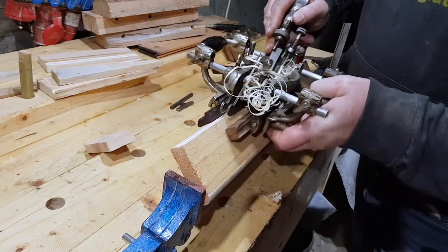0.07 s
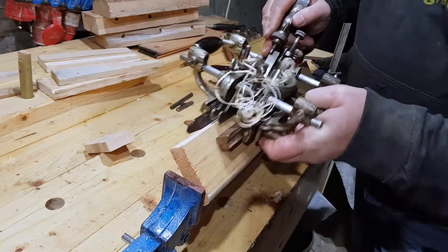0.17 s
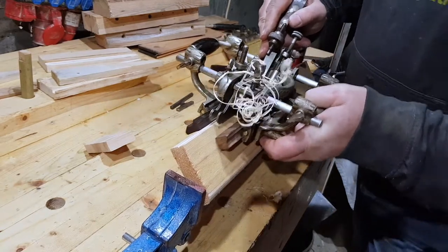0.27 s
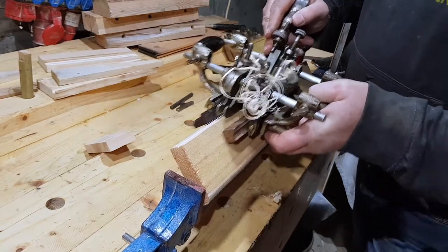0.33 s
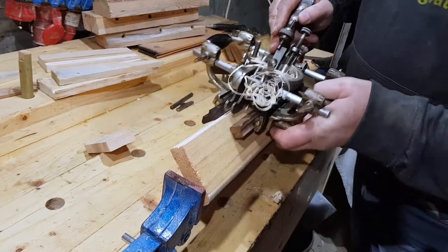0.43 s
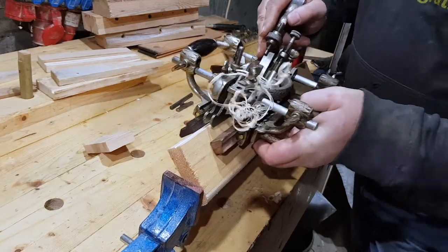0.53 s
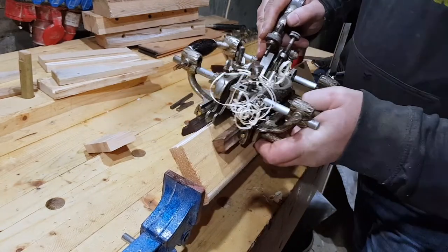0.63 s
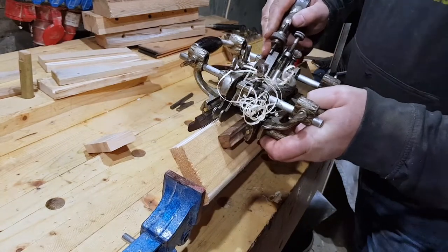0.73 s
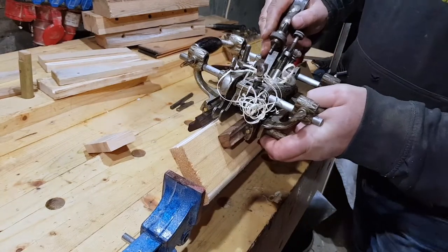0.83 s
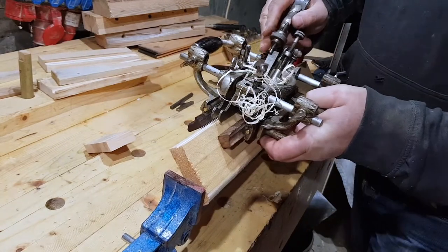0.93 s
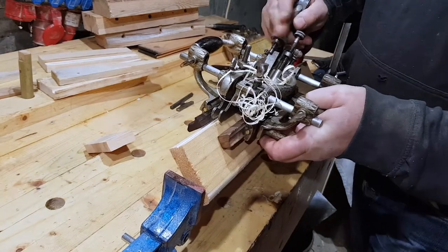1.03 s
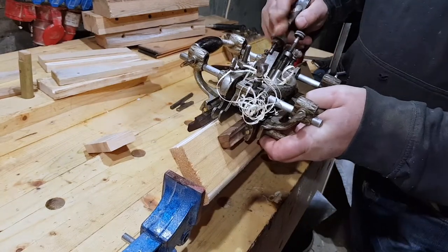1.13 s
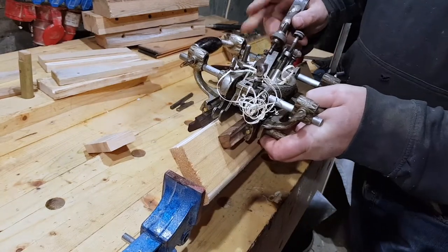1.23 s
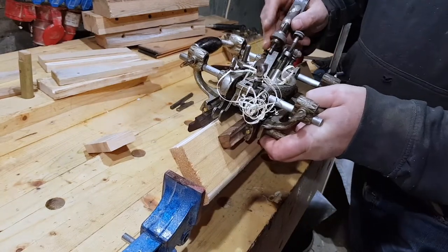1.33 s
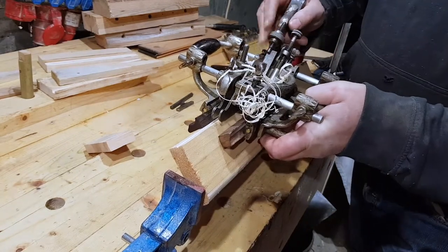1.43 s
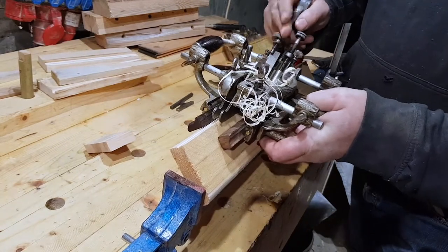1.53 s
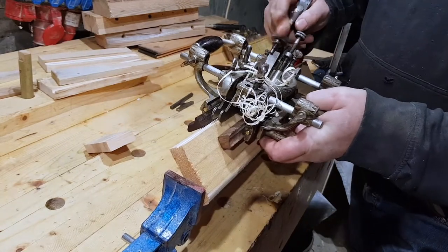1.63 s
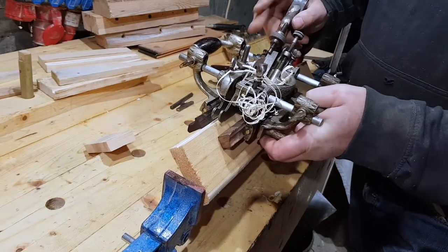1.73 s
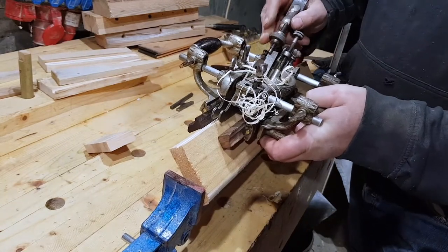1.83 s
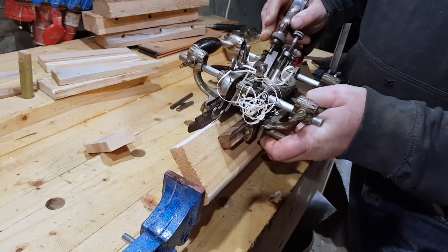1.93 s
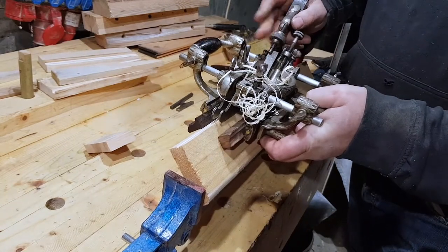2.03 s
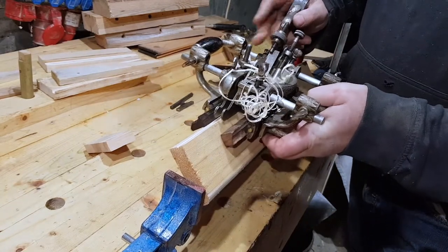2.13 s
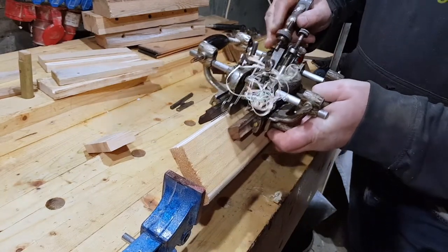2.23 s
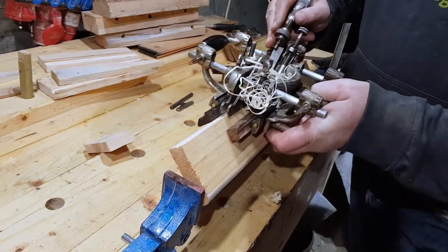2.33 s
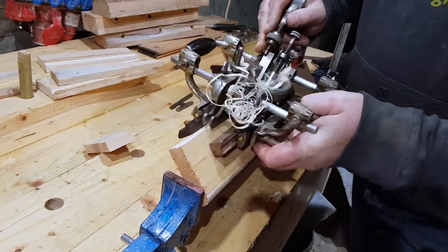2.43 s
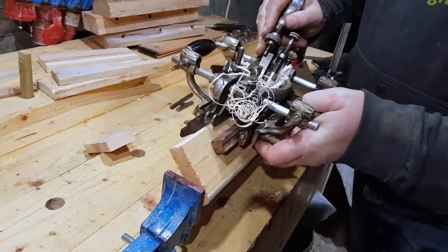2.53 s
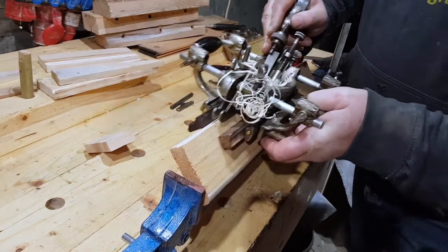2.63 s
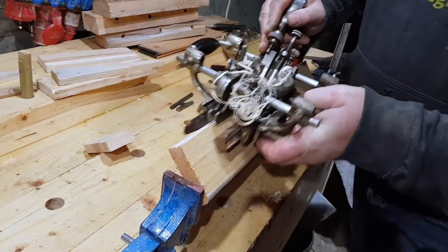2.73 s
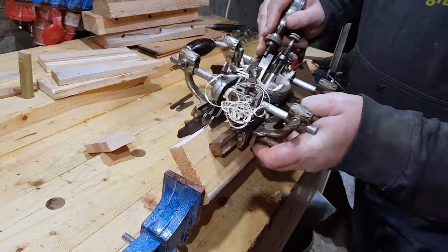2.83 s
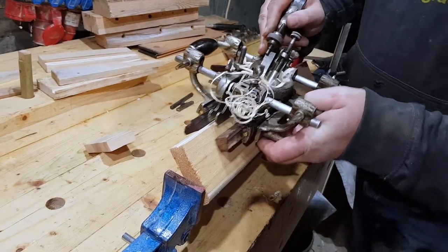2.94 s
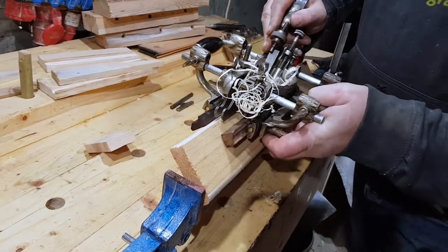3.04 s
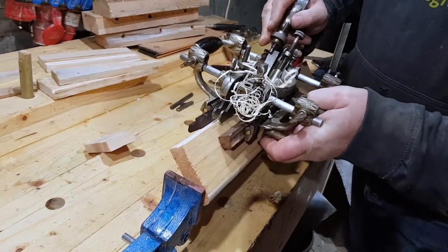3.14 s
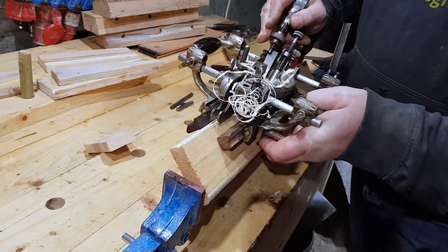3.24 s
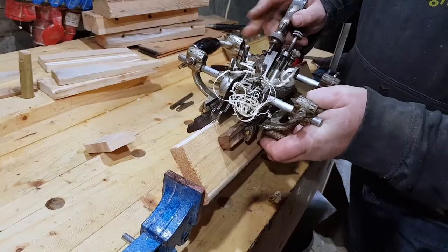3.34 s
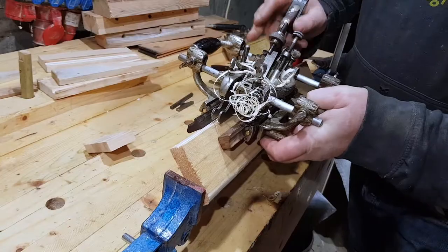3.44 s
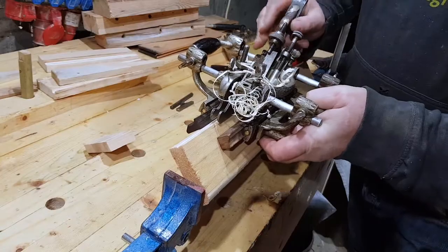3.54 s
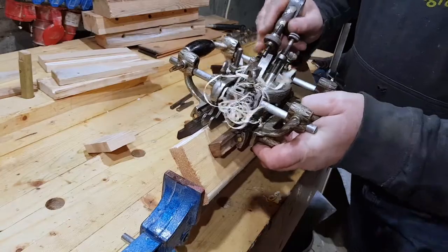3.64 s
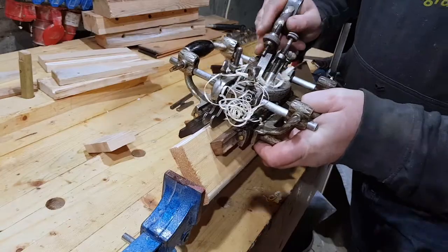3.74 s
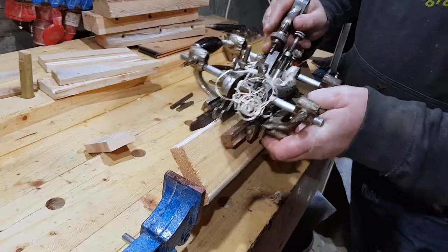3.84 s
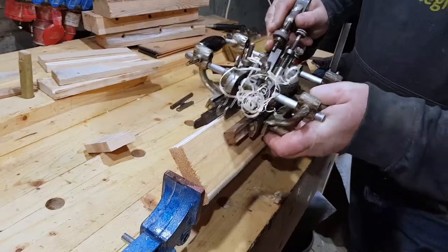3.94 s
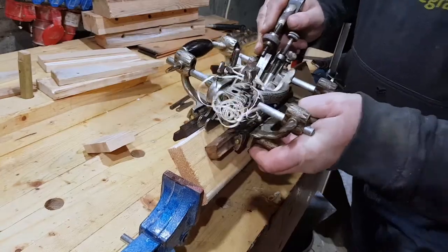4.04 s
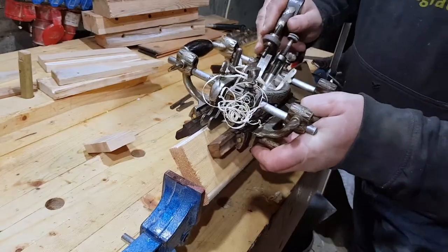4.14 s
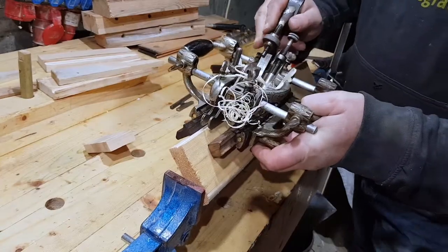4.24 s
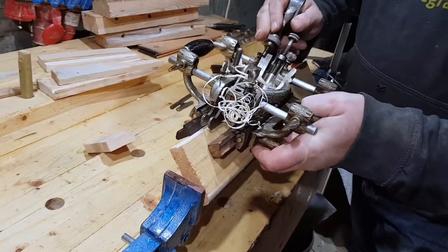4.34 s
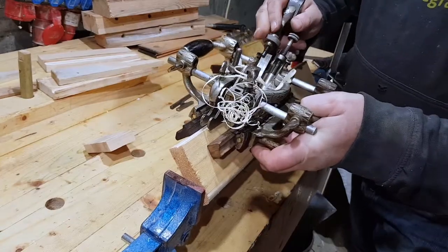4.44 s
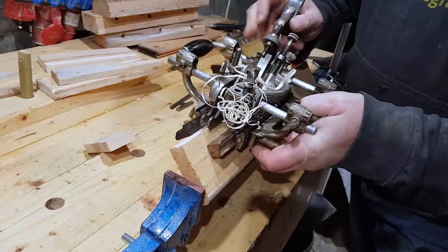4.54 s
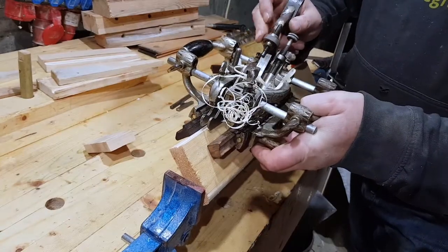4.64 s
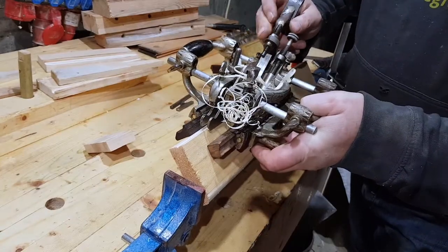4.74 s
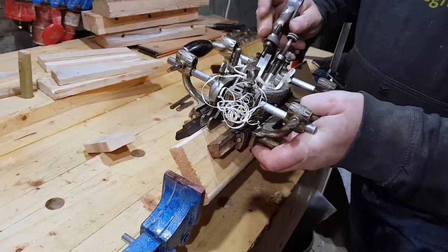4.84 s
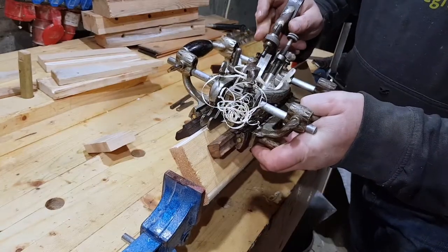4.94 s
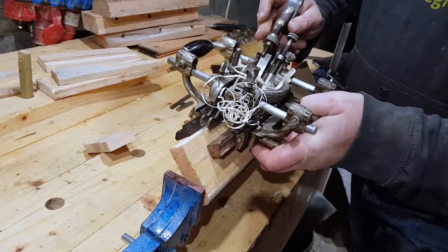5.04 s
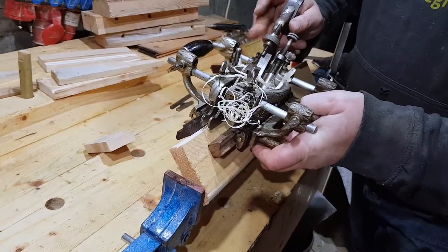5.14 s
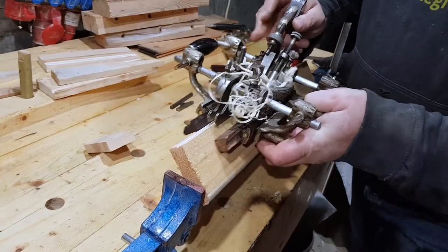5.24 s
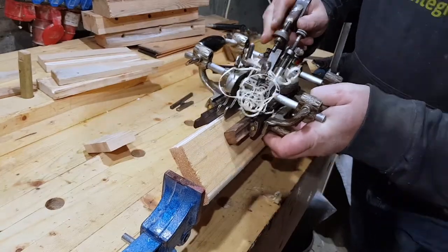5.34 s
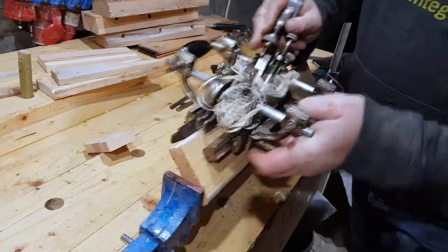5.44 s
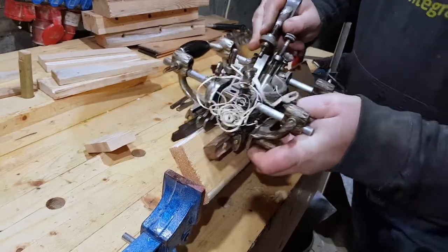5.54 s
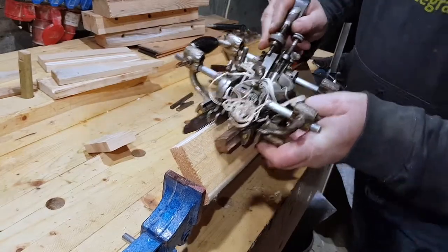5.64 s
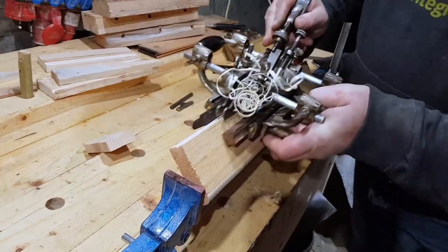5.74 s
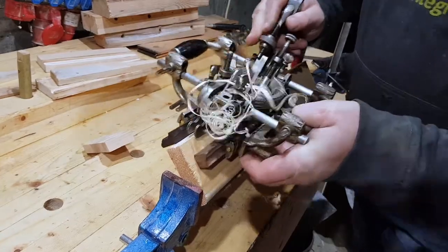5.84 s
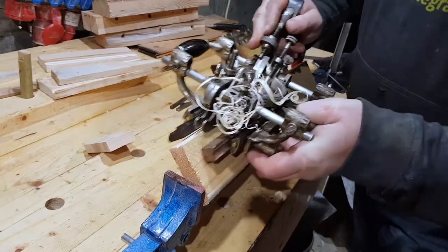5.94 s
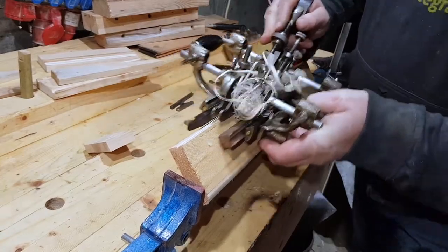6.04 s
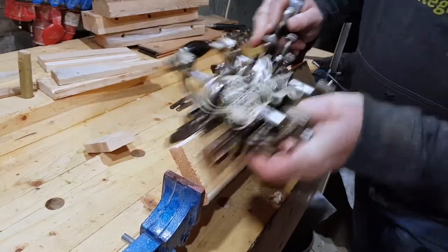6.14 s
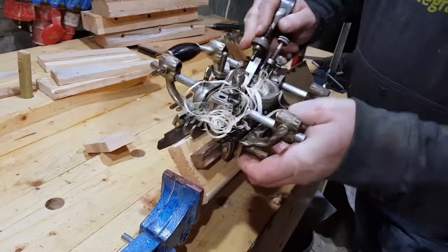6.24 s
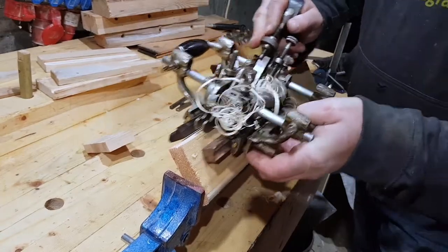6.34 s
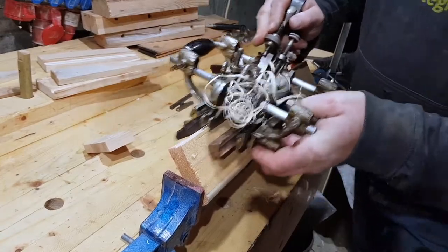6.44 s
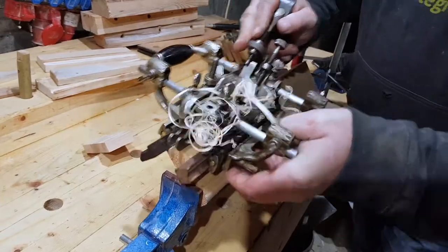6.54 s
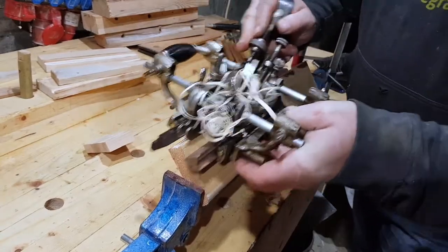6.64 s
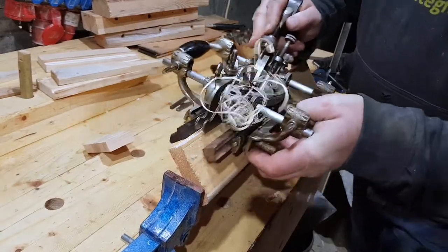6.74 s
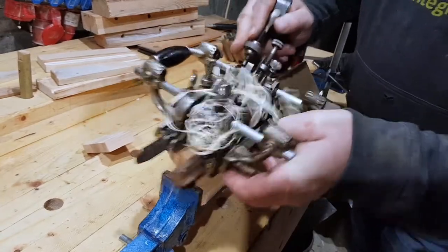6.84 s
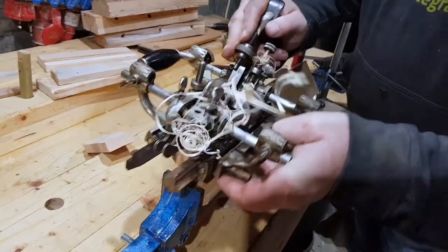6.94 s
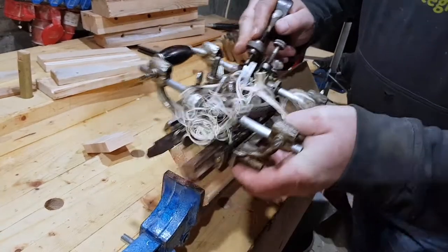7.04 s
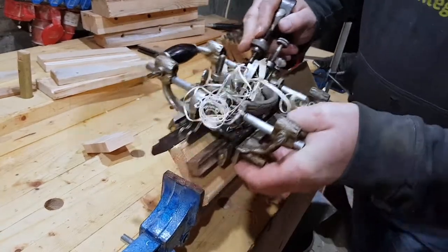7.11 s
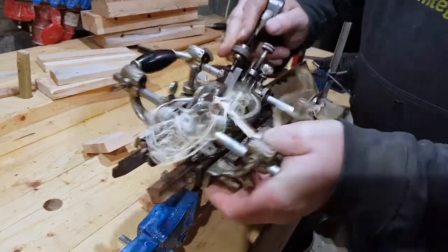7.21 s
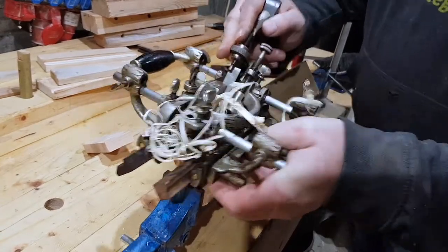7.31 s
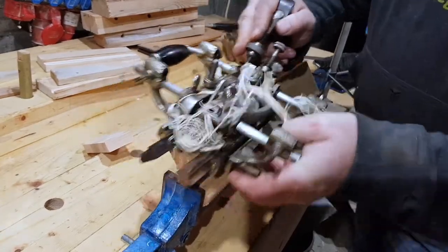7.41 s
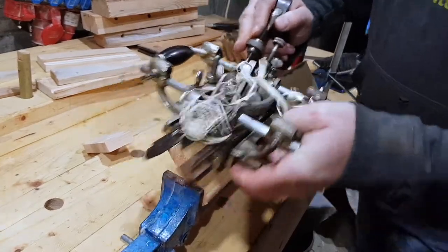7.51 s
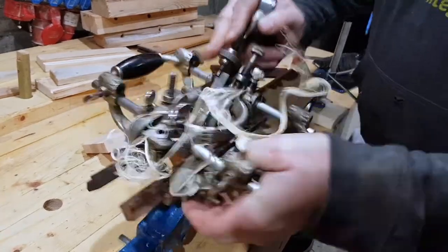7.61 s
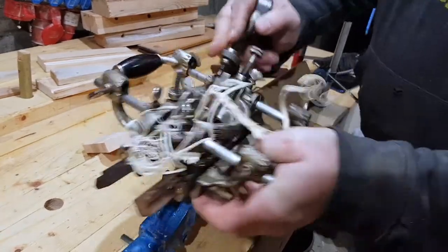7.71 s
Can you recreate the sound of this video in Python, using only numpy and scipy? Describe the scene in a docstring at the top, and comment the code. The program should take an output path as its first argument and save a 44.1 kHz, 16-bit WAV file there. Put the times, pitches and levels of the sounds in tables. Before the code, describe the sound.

Close-up short scrapes and woody knocks of a steel plane on a board, pausing at times, then coming quick and steady over low bench thumps.

```python
"""A quiet workshop, microphone close to a board in a bench vice: a metal plane is pushed in short quick strokes.
Knocks and cuts open it; about 1 to 2.2 s mostly faint gentle strokes pass, then a flurry comes near 2.5 s
and more strokes near 4 s. After a lull before 5.3 s the strokes come thick to the end: filtered noise for torn
fibres and rubbed wood, struck modes for board, booming bench and faint steel, noise bursts for snapping shavings.
Behind all lie a faint room echo, still air and microphone hiss; automatic gain yields to loud sound."""
import sys
import numpy as np
from scipy import signal
from scipy.fft import rfft, irfft, next_fast_len
from scipy.io import wavfile
from scipy.ndimage import uniform_filter1d, map_coordinates

SR = 44100
rng = np.random.default_rng(int(sys.argv[2]) if len(sys.argv) > 2 else 0)


def store_wav(level_fs):
    """Save 16-bit WAV to argv[1]."""
    pcm = np.round(np.clip(np.atleast_2d(level_fs), -1, 1) * 32767)
    wavfile.write(sys.argv[1], SR, pcm.T.astype(np.int16))


N = 342657

# The iron bites: (time of peak [s], force [dB], fall by 20 dB [s], fizz over force [dB], rub over force [dB])
CUTS = [(0.145, -59.5, 0.13, -32, 27), (0.185, -59, 0.048, -2, 14), (0.509, -44.5, 0.074, -27, 16.5),
        (0.546, -60, 0.044, 5.5, 9.5), (2.396, -49.5, 0.092, -12, 11.5), (2.77, -50, 0.086, -15, 16.5),
        (3.996, -45, 0.082, -16.5, 18), (5.434, -48.5, 0.077, -10, -8), (5.812, -47, 0.082, -11.5, 8.5),
        (6.174, -48, 0.02, -11, 19.5), (6.225, -58, 0.25, -15, 15.5), (6.511, -55.5, 0.09, -6, 23.5),
        (6.833, -47.5, 0.079, -18, 19.5), (7.182, -52, 0.12, -8.5, 19.5), (7.583, -48.5, 0.051, -11, 18.5)]
# Gentler, round-topped strokes that tear fewer fibres:
# (time of peak [s], force [dB], rise by 20 dB [s], fall by 20 dB [s])
GENTLE_STROKES = [(0.037, -64.5, 0.088, 0.089), (0.378, -55.5, 0.066, 0.073), (0.764, -79.5, 0.29, 0.041),
                  (1.517, -73.5, 0.093, 0.086), (2.148, -77, 0.036, 0.074), (2.229, -61, 0.087, 0.11),
                  (2.66, -69.5, 0.1, 0.04), (2.991, -64.5, 0.13, 0.077), (3.173, -67, 0.084, 0.044),
                  (3.621, -56.5, 0.046, 0.065), (3.895, -61.5, 0.14, 0.03), (5.31, -61, 0.13, 0.2),
                  (5.678, -58.5, 0.062, 0.049), (6.042, -63, 0.13, 0.052), (6.131, -62, 0.034, 0.016),
                  (6.7, -70.5, 0.079, 0.062), (7.058, -66, 0.12, 0.029), (7.41, -67, 0.066, 0.12),
                  (7.768, -72, 0.1, 0.047)]
# The tool slips suddenly: (time of peak [s], force [dB])
NUDGES = [(1.011, -78.5), (3.251, -70), (3.33, -70), (3.575, -81), (3.68, -59.5), (4.206, -73),
          (4.469, -72.5), (5.553, -59.5)]
# Tearing fibres: (frequency [Hz], relative level per Hz [dB])
RASP = [(710, -7), (1200, -15), (2710, -18), (3870, -14.5), (6950, -20.5), (10000, -28.5), (13000, -30.5),
        (22000, -120)]
# Bright edge of the tearing: (frequency [Hz], relative level per Hz [dB])
FIZZ = [(6000, -64), (8000, -4.5), (10500, -8.5), (14000, -10.5), (15600, -9), (15900, -35), (17000, -46)]
# Iron and rods of the plane: (frequency [Hz], width [Hz], relative level [dB])
STEEL = [(3890, 50, 0), (11800, 22, -2)]
# The plane's casting: (frequency [Hz], width [Hz], relative level [dB])
CASTING = [(1524, 45, 5), (1688, 45, 3), (1809, 20, 1), (2400, 180, 1.5), (3028, 32, -5.5)]
# Board modes, before a knock shifts or damps them: (frequency [Hz], width [Hz], relative level [dB])
BOARD = [(145, 32, -5), (205.3, 29, -4), (309, 53, -3), (390.8, 11.4, 5.5), (469, 67, -3), (592.3, 36, 1),
         (637, 79, -5), (826, 63, -3), (1032, 76, -7), (1201, 37, -5.5), (1507, 100, -10.5),
         (1735, 49, -11.5), (2210, 480, -17.5), (3060, 120, -24), (4400, 1900, -34)]
# Tool on board: (time [s], level [dB], hardness [dB], weight [dB], clack [dB])
KNOCKS = [(0.107, -36, -13, -10, 1), (0.164, -28, -20, -10.5, -6), (0.216, -40.5, -23, -1.5, 4),
          (0.456, -35.5, -34, -10.5, 5.5), (0.502, -35.5, -12, -7, 15), (0.530, -28.5, -2, -7.5, 8),
          (0.608, -38.5, -10, -17, 4.5), (0.712, -48.5, -30, -18, -17), (0.802, -57, -27, -12, 2.5),
          (1.017, -51.5, -15, -35, -6), (1.321, -50.5, -29, -20, -7), (1.446, -47, -10, -15, 0.5),
          (1.7, -55.5, -31, -9.5, -5), (1.874, -48.5, -5.5, -19, 10), (2.3, -46, -8.5, -8, 4),
          (2.33, -43, -8, -3, 7), (2.352, -37.5, -4.5, -18, -18), (2.378, -30, -8, -17, -2),
          (2.418, -28, -10.5, -13, 0), (2.466, -31, -15.5, -9.5, -4), (2.485, -42, -8, -6, 12),
          (2.593, -32.5, -24, -18.5, -1), (2.743, -37.5, -12, -12.5, 8.5), (2.777, -41.5, -15, 0, -3),
          (3.571, -54, -1.5, -7.5, 11), (3.647, -38, -5.5, -11, 7), (3.929, -42, -21, -12.5, 0),
          (4.015, -30, -4, -9, 2), (4.189, -40.5, -31, -14.5, -1.5), (4.29, -53.5, -29, -7.5, -19),
          (4.335, -46.5, -24, -25.5, -11), (4.467, -56, -8, -21, -1), (4.489, -50.5, -12, -16, -10),
          (4.621, -45, -17.5, -12.5, -5.5), (5.364, -46, -22, -4, 4), (5.446, -29, -4, -9, 5.5),
          (5.522, -30.5, -16.5, -18.5, 2), (5.633, -30, -21, -14.5, 3.5), (5.736, -38, -14, -13, -2),
          (5.813, -25.5, -10, -13, 5), (5.888, -31, -20, -14, -0.5), (6.007, -35, -15, -13.5, 4),
          (6.167, -29.5, -2.5, -14.5, 4.5), (6.212, -24, -9, -9, 0), (6.226, -35.5, -16, -25, 13),
          (6.36, -35.5, -15, -16, 6), (6.497, -31, -1.5, -10, 7.5), (6.597, -43, -2, -11.5, 3.5),
          (6.696, -37, -16, -12, 5.5), (6.897, -37.5, -9, -4, 4), (7.177, -37.5, 2.5, -5, 10),
          (7.21, -42.5, -4, 3.5, -3), (7.572, -40.5, 6.5, -5, -8), (7.736, -43, -15, -8, 3.5)]
# Shavings snap: (time [s], level [dB], top over level [dB])
TICKS = [(0.76, -48, -20), (2.1796, -33, -43), (2.4195, -32.5, -2.5), (2.5441, -35.5, -7),
         (2.782, -33.5, -3), (3.251, -44, -15), (3.33, -47.5, -10), (3.572, -47, -28), (3.6747, -30.5, -20),
         (3.833, -45.5, -5), (4.0164, -33, -12.5), (4.0521, -27, -20), (4.204, -44.5, -12),
         (4.4666, -57, -3), (5.8137, -38, 0), (6.4981, -23, -13.5), (6.5251, -35, 1.5),
         (6.8443, -16.5, -45), (6.8693, -56, 7), (6.8778, -36.5, 4), (7.044, -41, -13),
         (7.203, -26.5, -10.5), (7.4016, -23.5, -14), (7.5807, -22, -12)]
# Lower and upper colour of a snap: (frequency [Hz], relative level per Hz [dB])
TICK_LOW = [(800, -0.5), (3500, -3.5), (8000, 5), (11000, -3.5)]
TICK_TOP = [(7000, -3.5), (10500, 10.0), (15500, 7.0), (17000, -23.5)]
# A thin steel ring as a stroke ends: (time [s], level [dB])
PINGS = [(0.5526, -51), (2.4513, -58), (3.677, -55), (4.0502, -50), (5.4767, -50), (5.8594, -63),
         (6.2108, -61), (7.6221, -66)]
# The hands shove the bench: (time of peak [s], force [dB], fall by 20 dB [s])
SHOVES = [(0.122, -47.5, 1), (0.234, -42.5, 0.27), (0.493, -42.5, 0.39), (1.105, -63.5, 0.65),
          (1.506, -53, 0.21), (1.717, -63.5, 0.34), (2.169, -61.5, 0.69), (2.262, -49.5, 0.97),
          (2.421, -43, 0.256), (2.793, -43.5, 0.41), (3.151, -60.5, 0.22), (3.667, -35, 0.13),
          (3.796, -52, 0.95), (4.028, -38, 0.15), (4.217, -56.5, 0.21), (4.641, -71.5, 0.1),
          (5.158, -71, 0.69), (5.312, -58.5, 0.076), (5.467, -38, 0.29), (5.836, -40.5, 0.48),
          (6.19, -34.5, 0.084), (6.518, -42.5, 0.44), (6.869, -50, 0.32), (7.06, -53, 0.81),
          (7.224, -40.5, 0.073), (7.586, -46.5, 0.3)]
# Lowest bench modes, before a knock shifts or damps them: (frequency [Hz], width [Hz], relative level [dB])
BENCH = [(49, 16, -0.5), (76.03, 5.43, 5.5), (116, 19.6, -6)]
# Echo of the workshop: (frequency [Hz], time to die by 60 dB [s])
SHOP = [(100, 0.77), (1000, 0.14), (10000, 0.18)]
# Still air and microphone hiss: (frequency [Hz], relative level per Hz [dB])
ROOM_TONE = [(18, -45.5), (30, -4.5), (59, -4.5), (200, 4.5), (1050, -13), (2190, -13.5), (4830, -20),
             (5650, -18.5), (7550, -25), (10900, -10.5), (15900, -10), (16300, -44.5)]
# Stereo microphone, likeness of its sides: (frequency [Hz], left-right likeness [0 to 1])
ALIKE = [(60, 1), (250, 0.94), (500, 0.89), (1000, 0.35), (3000, 0.017), (12000, 0)]
# Stereo microphone, balance of its sides: (frequency [Hz], left minus right [dB])
LEAN = [(60, 2), (550, 0.5), (5000, -2), (9000, 5.5), (15000, 2.5)]

CUT_RISE_S = 0.053  # rises and falls of forces are by 20 dB
GENTLE_FIZZ_DB, GENTLE_RUB_DB = -10, 12  # over force
GENTLE_RING_DB, GENTLE_BREAK_DB = 5, -6.5  # casting ring and fibre breaks over force
NUDGE_RISE_S, NUDGE_FALL_S, NUDGE_FIZZ_DB, NUDGE_RUB_DB = 0.0071, 0.073, -12.5, 15
BITE_SHAPE, GENTLE_SHAPE = 0.9, 1.66  # peaked for cuts and nudges, round-topped for gentle strokes
BREAKS_PER_S = 220
SHARPNESS = 0.27  # dB more blow for each dB of hardness
DAMPING = 0.21  # dB wider modes for each dB of knock: a firmly pressed tool deadens the board
SPOT_SHIFT, SPOT_DB = 0.025, 3  # every knock's new spot: spread of mode frequency [fraction] and level [dB]
CRACKLE_T60_S = 0.068
PING_HZ, PING_T60_S = 8830, 0.17
SHOVE_RISE_S = 0.093
JOLT_LEAD_S, JOLT_DB = 0.01527, 39.5  # a shove starts with one jolt, ahead of its peak
ROOM_TONE_DB = -73
TOP_HZ = 16900


def amp(db):
    """dB to gain."""
    return 10 ** (np.asarray(db) / 20)


def unit(x):
    """Scaled to rms 1."""
    return x / np.sqrt(np.mean(x ** 2) + 1e-20)


def along(points, hz):
    """Values of (Hz, value) points, read on a log frequency axis."""
    f, v = np.transpose(points)
    return np.interp(np.log(hz + 1), np.log(f + 1), v)


def wobble(rate):
    """A smooth random curve, rate knots a second."""
    knots = rng.standard_normal(int(N * rate / SR) + 4)
    return map_coordinates(knots, [np.arange(N) * rate / SR])


def filtered(x, response):
    """x times a complex response of frequency."""
    m = next_fast_len(N + SR // 2)
    return irfft(rfft(x, m) * response(np.fft.rfftfreq(m, 1 / SR)), m)[..., :N]


def coloured(points):
    """The response of (Hz, dB) points."""
    return lambda hz: amp(along(points, hz))


def resonant(modes):
    """The causal response of (Hz, width, dB) modes with alternating signs."""
    def mode(f, centre, width, db):
        return amp(db) * 1j * f * width / (centre * centre - f * f + 1j * f * width)
    return lambda f: sum((-1) ** k * mode(f, *row) for k, row in enumerate(modes))


def mid_side(hz):
    """Mid and side weights that give the two channels their likeness at each frequency."""
    turn = np.arccos(np.clip(along(ALIKE, hz), -1, 1)) / 2
    return np.array([np.cos(turn), 1j * np.sin(turn)])


def rush(response, force=1, blows=0):
    """Stereo noise under a force envelope, and single blows, drive a response; a steady force of 1 gives rms 1."""
    power = np.mean(np.abs(response(np.linspace(0, SR / 2, 8192))) ** 2)
    drive = (force * rng.standard_normal((2, N)) + blows) / np.sqrt(power)
    mid, side = filtered(drive, lambda f: response(f) * mid_side(f))
    return np.array([mid + side, mid - side])


def bursts(times, db, t60, attack):
    """A force that jumps at each time and dies away."""
    out, t = np.zeros(N + SR), np.arange(SR // 4) / SR
    for s, level, life in np.broadcast(times, db, t60):
        out[round(s * SR):][:len(t)] += amp(level - 60 * t / life) * (1 - np.exp(-t / attack))
    return out[:N]


def swell(s, db, rise, fall, shape):
    """A force that peaks at s; it lies 20 dB lower a rise before and a fall after."""
    t = np.arange(N) / SR
    out = np.zeros(np.shape(db)[:1] + (N,))
    near = slice(max(0, round((s - 3 * rise) * SR)), round((s + 3 * fall) * SR))
    away = np.where(t[near] < s, (s - t[near]) / rise, (t[near] - s) / fall)
    out[..., near] = amp(db - 20 * away ** shape)
    return out


def patchy(x, db):
    """Random gain in patches of time and frequency."""
    z = signal.stft(x, nperseg=256)[2]
    field = rng.standard_normal(z.shape[1:])
    for axis in (0, 1):
        field = uniform_filter1d(field, size=4, axis=axis)
    return signal.istft(z * amp(db * unit(field)), nperseg=256)[1][:, :N]


def slides():
    """Each slide swells and fades: fibres tear in grains, the steel rings, the skate rubs the board in lumps."""
    tear, fizz_force, rub_force, ring_force, break_force = moves()
    t = np.arange(N) / SR
    breaks = (rng.random(N) < BREAKS_PER_S / SR) * amp(2.85 * rng.exponential(size=N))  # single fibres give way
    snaps = break_force * breaks
    crackle = 1 + 0.18 * np.convolve(breaks, amp(-60 * t[:400] / 0.017))[:N]
    grain = unit(amp(2.23 * wobble(60) + 0.33 * wobble(500)) * crackle)  # uneven wood
    rasp = amp(9.0) * rush(coloured(RASP), tear * grain, amp(15) * snaps)
    flicker = unit(amp(2.6 * wobble(800)))
    fizz = amp(14.0) * rush(coloured(FIZZ), fizz_force * grain * flicker)
    steel = amp(-9.5) * rush(resonant(STEEL), tear * grain)
    casting = amp(-0.5) * rush(resonant(CASTING), ring_force * grain, amp(16.5) * snaps)
    lumps = unit(amp(2.0 * wobble(45) + 5.7 * wobble(150)))
    rub = amp(-5.0) * rush(resonant(BOARD[3:]), rub_force * lumps, amp(23.5) * snaps)
    return patchy(rasp + fizz, db=2.0) + steel + casting + rub


def moves():
    """Tear, fizz, rub, ring and fibre-break forces of every cut, gentle stroke and nudge."""
    gentle_over = [0, GENTLE_FIZZ_DB, GENTLE_RUB_DB, GENTLE_RING_DB, GENTLE_BREAK_DB]
    nudge_over = [0, NUDGE_FIZZ_DB, NUDGE_RUB_DB, GENTLE_RING_DB, 0]
    rows = [(s, db, CUT_RISE_S, fall, [0, fizz_db, rub_db, 0, 0], BITE_SHAPE)
            for s, db, fall, fizz_db, rub_db in CUTS]
    rows += [(*row, gentle_over, GENTLE_SHAPE) for row in GENTLE_STROKES]
    rows += [(*row, NUDGE_RISE_S, NUDGE_FALL_S, nudge_over, BITE_SHAPE) for row in NUDGES]
    return sum(swell(s, db + np.array(over_db)[:, None], rise, fall, shape)
               for s, db, rise, fall, over_db, shape in rows)


def knocks():
    """A blow and a rough settling contact; a heavy one wakes the low modes and the bench, a hard one the high."""
    s, db, hard_db, heavy_db, clack_db = np.transpose(KNOCKS)
    length = 16384
    t, f = np.arange(length) / SR, np.fft.rfftfreq(length, 1 / SR)
    groups = (  # modes, level of each knock [dB], time for the contact to die by 60 dB [s]
        (BOARD[:3], db + heavy_db + 10, 0.1),
        (BOARD[3:6], db - 3.5, 0.16),
        (BOARD[6:9], db + clack_db - 8.5, 0.11),
        (BENCH, db + heavy_db + 6, 0.05),
        (BOARD[9:], db + hard_db - 3.0, 0.1))
    spectrum = 0
    for modes, level, t60 in groups:
        contact = amp(-60 * t / t60) * (1 - np.exp(-t / 0.002))
        force = contact * rng.standard_normal((len(s), 2, length))
        force[..., 0] = amp(22 + SHARPNESS * hard_db)[:, None]  # the blow itself
        spots = np.repeat([modes], len(s), axis=0)
        spots = spots + rng.standard_normal((len(s), len(modes), 1)) * [0, 0, SPOT_DB]
        spots[..., 0] *= 1 + SPOT_SHIFT * rng.standard_normal((len(s), len(modes)))
        spots[..., 1] *= amp(DAMPING * (db - db.min()))[:, None]
        low_cut = 1j * f / (1.08 * modes[0][0] + 1j * f)
        high_cut = 1 / (1 + 1j * f / (0.91 * modes[-1][0]))  # wood gives under the blow
        ring = resonant(spots.transpose(1, 2, 0)[..., None])(f) * (low_cut * high_cut) ** 2
        part = rfft(force) * ring[:, None]
        # each group's energy follows its force and level, whatever its modes
        energy = np.sum(force ** 2, axis=(1, 2)) / np.mean(np.abs(part) ** 2, axis=2).sum(axis=1)
        spectrum = spectrum + part * (amp(level) * np.sqrt(energy))[:, None, None]
    out = np.zeros((2, N + SR))
    starts = np.round(s * SR).astype(int)
    for at, (mid, side) in zip(starts, irfft(spectrum * mid_side(f))):
        out[:, at:at + length] += [mid + side, mid - side]
    return out[:, :N]


def ticks():
    """Shavings snap: sharp noise bursts, each with a softer, slower-dying crackle."""
    s, db, top_db = np.transpose(TICKS)

    def snap(level):
        sharp = bursts(s, level, t60=0.0081, attack=0.0001)
        return sharp + bursts(s, level - 7.0, CRACKLE_T60_S, attack=0.0029)

    low = rush(coloured(TICK_LOW), snap(db - 7.5))
    return low + rush(coloured(TICK_TOP), snap(db + top_db + 7.0))


def pings():
    """One thin steel note, struck and dying away."""
    s, db = np.transpose(PINGS)
    note = np.sin(2 * np.pi * PING_HZ * np.arange(N) / SR)
    return bursts(s, db, PING_T60_S, attack=0.001) * note


def bench():
    """Shoves set the bench booming in its lowest modes, which ring on."""
    s, db, _ = np.transpose(SHOVES)
    jolt_at = np.round(np.clip(s - JOLT_LEAD_S, 0, None) * SR).astype(int)
    jolts = np.bincount(jolt_at, amp(db + JOLT_DB), N)
    push = sum(swell(at, level, SHOVE_RISE_S, fall, shape=2.12) for at, level, fall in SHOVES)
    unsteady = unit(amp(0.97 * wobble(14)))

    def boom(hz):
        return resonant(BENCH)(hz) / (1 + 1j * hz / 300) ** 2  # dulled above 300 Hz

    return amp(1.5) * rush(boom, unsteady * push, jolts)


def shop(x):
    """The workshop's echo: a noise tail, 300 samples late, in which each frequency dies at its own speed."""
    hz, t, z = signal.stft(rng.standard_normal((2, SR // 2)), SR, nperseg=256)
    decay = amp(-60 * t / along(SHOP, hz)[:, None])
    tail = signal.istft(z * decay, SR, nperseg=256)[1]
    late = np.pad(x, ((0, 0), (300, 0)))
    return signal.fftconvolve(late, tail / np.linalg.norm(tail[0]), axes=1)[:, :N]


def room_tone():
    """Still air and microphone hiss: steady coloured noise."""
    return amp(ROOM_TONE_DB) * rush(coloured(ROOM_TONE))


def scene():
    """The tool and its echo, the bench, left-right balance and a low cut at 47 Hz, then the room tone."""
    tool = knocks() + ticks() + pings() + slides()
    near = tool + amp(-12.5) * shop(tool) + bench()

    def microphone(hz):
        balance = amp(along(LEAN, hz) * [[0.5], [-0.5]])
        return balance / (1 + (47 / (hz + 1)) ** 10.0)

    return filtered(near, microphone) + room_tone()


def record(dry):
    """Automatic gain eases down by up to 5.5 dB as the smoothed level rises, and back; then the band limit."""
    keep = np.exp(-1 / (0.12 * SR))  # 0.12 s smoothing
    power = signal.lfilter([1 - keep], [1, -keep], np.mean(dry ** 2, 0), zi=[1e-5])[0]
    level_db = 10 * np.log10(power + 1e-12)
    gain_db = -5.5 * np.clip((level_db + 70.5) / 18, 0, 1)
    return filtered(dry * amp(gain_db), lambda hz: hz < TOP_HZ)


dry = scene()
out = record(dry)
store_wav(out)
```